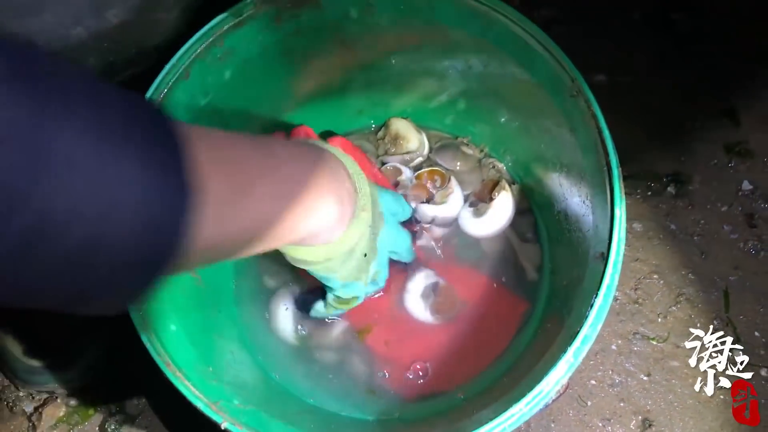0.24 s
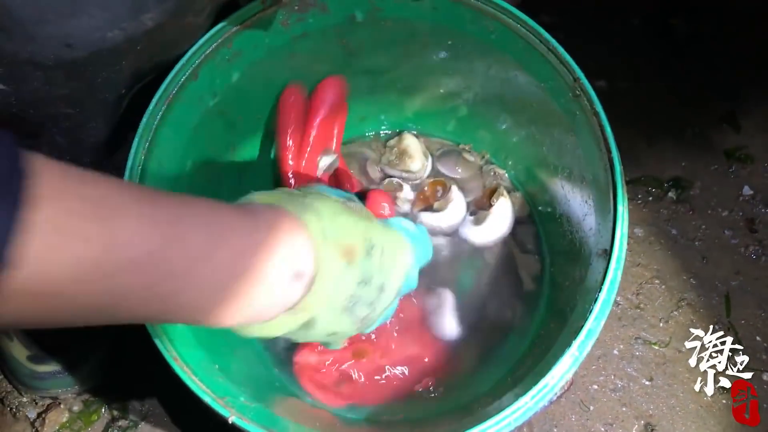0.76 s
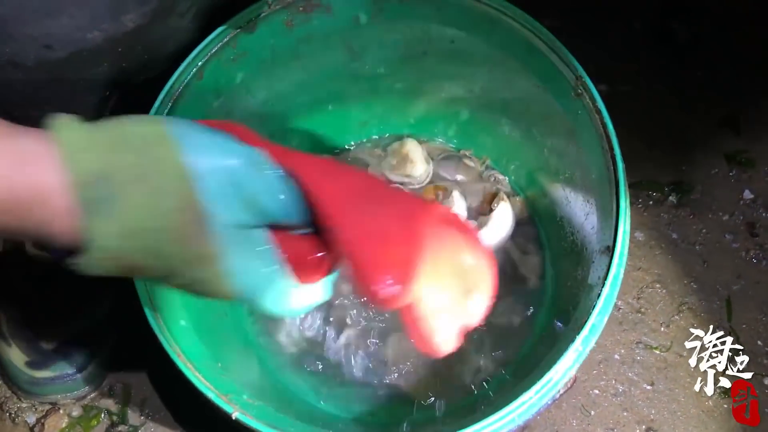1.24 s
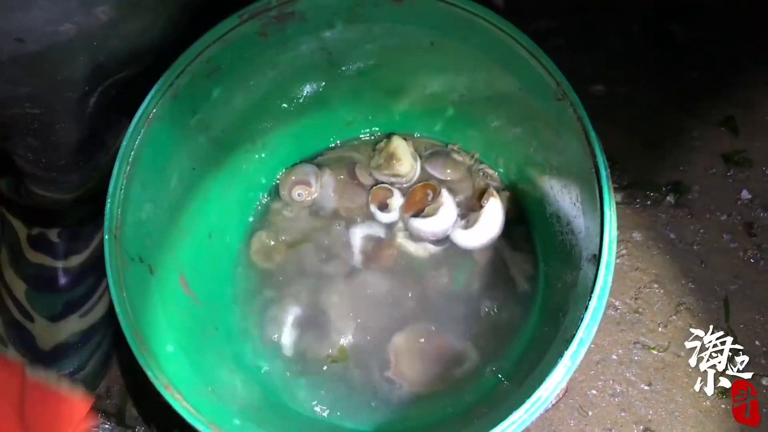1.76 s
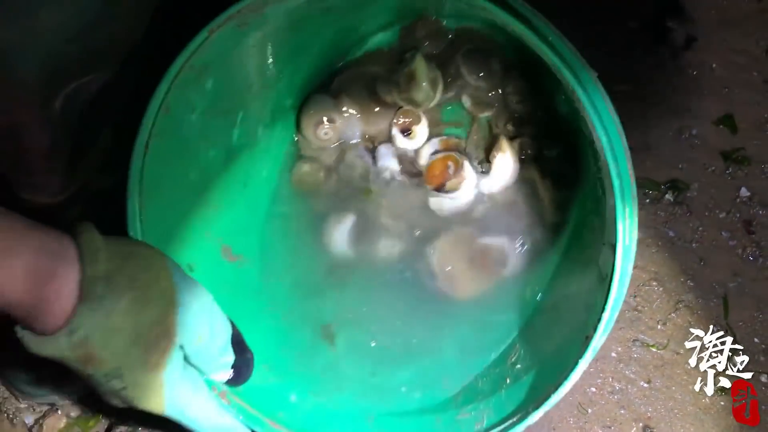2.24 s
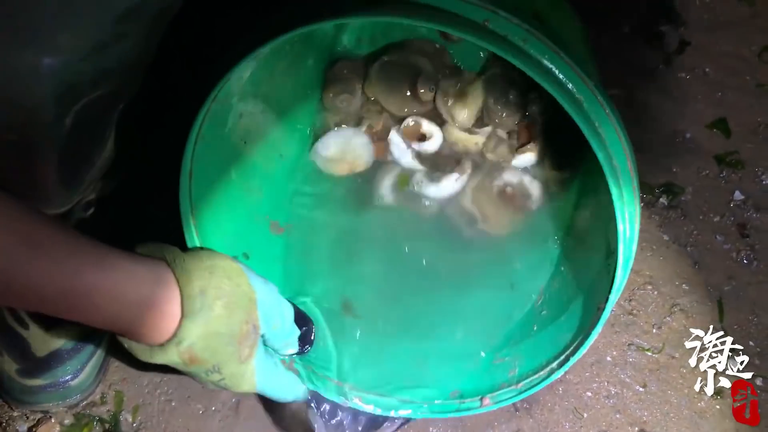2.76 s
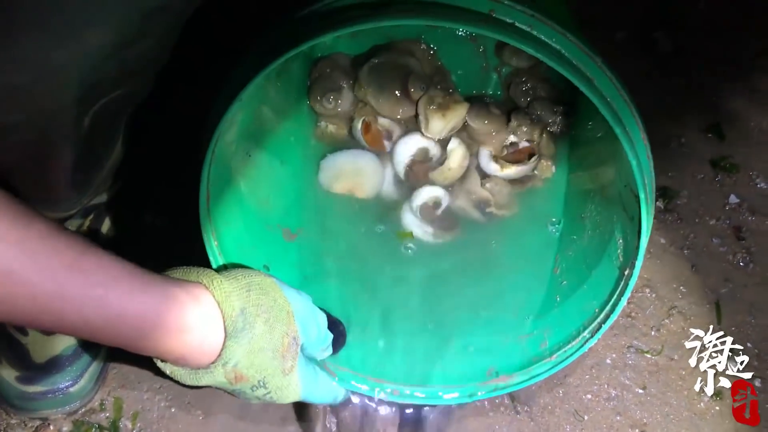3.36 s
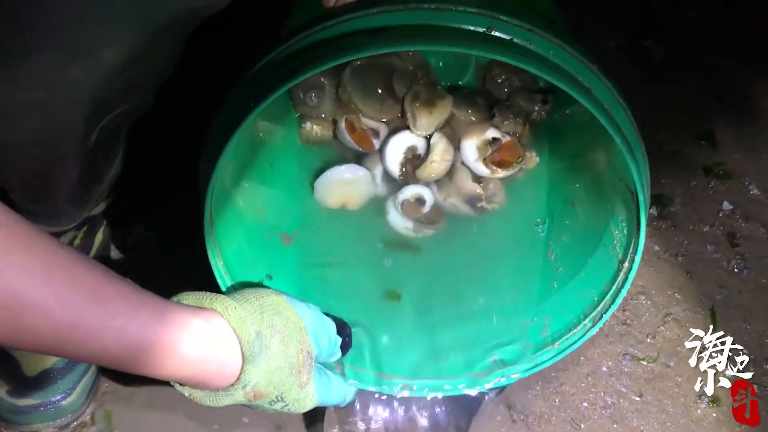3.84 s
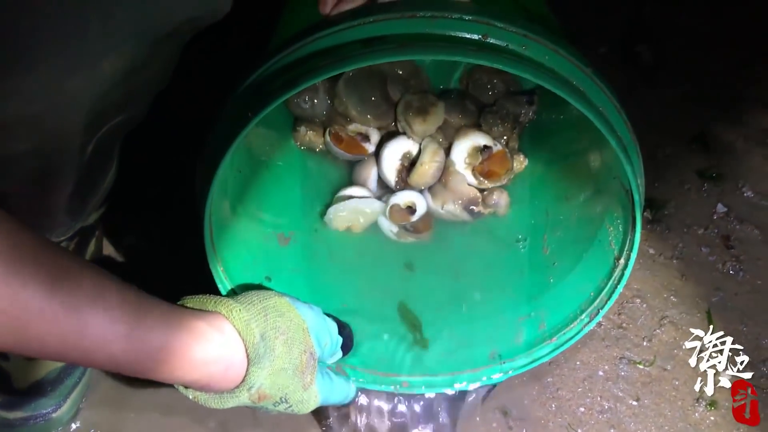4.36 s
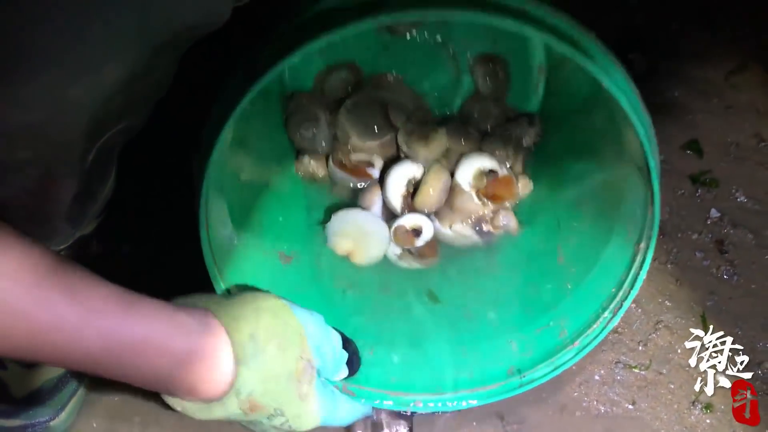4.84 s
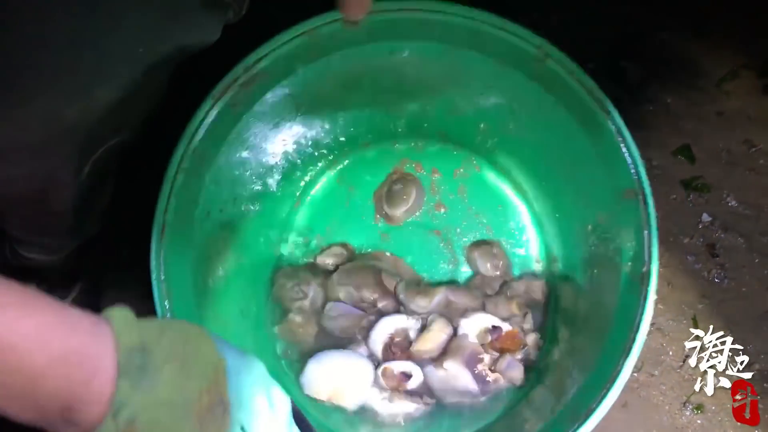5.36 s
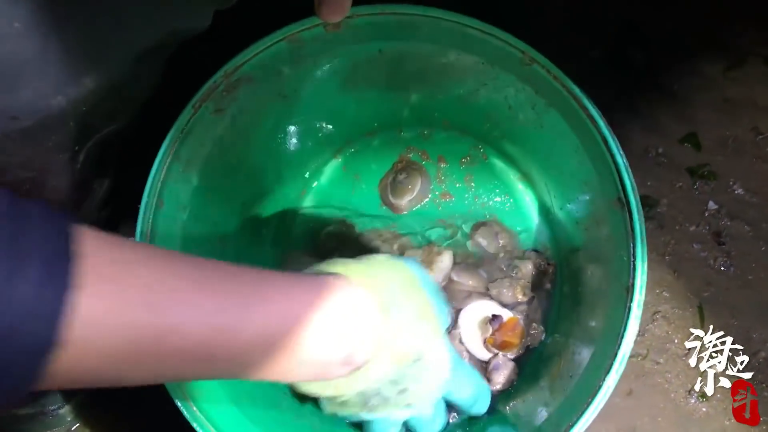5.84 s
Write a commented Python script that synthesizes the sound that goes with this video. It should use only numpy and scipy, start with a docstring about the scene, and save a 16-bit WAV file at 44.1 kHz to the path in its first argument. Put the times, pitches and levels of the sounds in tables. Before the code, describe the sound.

Close outdoor pickup with a faint steady noise bed and brief low wobbles of air against the microphone throughout. From 0 to 0.6 s water slaps and churns in a plastic bucket, with a sharp splash near 0.4. From 0.6 to 0.96 a wet rubber glove drags out, a rough rub and bright hiss growing quickly, then stopping. A splash follows at 1.05, and run-off bubbles and thins until about 1.6, with a few shell ticks. It is nearly quiet until crisp snaps near 2.0. From 2.1 to 2.85 the bucket tips: sloshing surges, shells sliding, hard clicks at 2.5 and 2.7. From 2.95 to 5.2 water pours unevenly onto wet sand, gurgling and spattering with plips and snaps, briefly stronger around 3.1-3.4. The bucket settles with a splash at 5.44. At 5.9 fingers dig in, wet churn and rattling shells peaking around 6.05.

```python
"""Seawater churns among shells in a plastic bucket: crowds of bubbles under a spray of droplets.
A hand pulls a rubber glove out (a rush of noise), tips the bucket, pours the water onto wet sand
(bubbles and spatter), sets it down and stirs the shells, which click as short damped modes.
Slaps, plips, snaps and trickles stand out in between. Outdoors, close by: puffs of air buffet
the microphone as low wobbles over a faint noise backdrop."""
import sys
import numpy as np
from scipy import signal
from scipy.fft import rfft, irfft
from scipy.io import wavfile
from scipy.ndimage import uniform_filter1d

SR = 44100
rng = np.random.default_rng(int(sys.argv[2]) if len(sys.argv) > 2 else 0)


def log_audio(samples):
    """Write samples as a 16-bit WAV file to the path given in sys.argv[1]."""
    # one column per channel
    frames = np.atleast_2d(samples).T
    # limit to full scale, then quantise
    limited = np.clip(frames, -1, 1)
    pcm = np.round(limited * 32767).astype(np.int16)
    wavfile.write(sys.argv[1], SR, pcm)


N = 268833
TIME = np.arange(N) / SR
FREQS = np.fft.rfftfreq(N, 1 / SR)
EDGE_HZ = 16050  # top of the audible band here

# Surges of water in the bucket. Each row: crest in seconds, churn in dB and spray in dB (both before
# the trims in slosh), rise in seconds, fall in seconds.
SURGES = [(.015, -50.5, -42, 0.04, 0.033), (.378, -40.5, -41, 0.038, 0.077), (.485, -49, -47, 0.017, 0.14),
          (.66, -48.5, -60, 0.07, 0.13), (1.055, -44.5, -43, 0.043, 0.082), (2.19, -41.5, -49, 0.26, 0.3),
          (2.35, -42.5, -47.5, 0.023, 0.29), (2.51, -38.5, -51, 0.041, 0.11), (2.69, -40, -47, .06, 0.068),
          (2.82, -43.5, -50, 0.024, 0.079), (5.33, -51, -55, 0.17, .05),
          (5.444, -40.5, -39.5, 0.014, 0.026), (5.56, -48.5, -59, 0.1, 0.41),
          (5.89, -38.5, -42, 0.0049, 0.05), (5.99, -35.5, -49, 0.044, 0.097)]
LAP_DB, LAP_SPRAY_DB = -61, -59.5  # the water never quite comes to rest; before the same trims
# Air in the bucket and its wall. Each row: resonance in Hz, width in Hz, relative level in dB.
BUCKET = [(700, 107, 10.5), (900, 186, 4), (1350, 85, -1.5), (1700, 176, -1), (3260, 210, -21)]
# Tone of the churn and of the spray. Each row: frequency in Hz, relative level in dB.
CHURN_COLOUR = [(150, -14), (300, 3.5), (470, -12), (750, -6), (1300, 0.5), (2000, -1.5), (3000, -7),
                (4500, -17), (8000, -38)]
SPRAY_COLOUR = [(1000, -39), (2500, -2.5), (3600, 1), (4800, -4.5), (6500, -2.5), (8500, -7), (10400, -12),
                (12000, -6), (16000, -8)]

# Wet rubber slides out over the shells, faster and faster until it comes free.
PULL_START_S, PULL_FREE_S, PULL_RELEASE_S = 0.6, 0.96, 0.022
# level at full speed, and the power of the speed that it follows
RUB_DB, RUB_GROWTH, HISS_DB, HISS_GROWTH = -39.5, .6, -34.5, 1.46
# Tone of the rubbing. Each row: frequency in Hz, relative level in dB.
RUB_COLOUR = [(200, -0.5), (600, -8.5), (900, -3), (1100, -5.5), (1400, 9.5), (1650, -10), (2000, 2.5),
              (2700, -14), (3500, -19), (5000, -15), (9000, -41)]

# The stream from the rim onto the sand, strongest when the bucket tips further. Each row: time in
# seconds, bubbling in dB, spatter in dB (both before the trims in pour).
POUR = [(2.95, -58, -79), (2.99, -54, -51), (3.11, -45, -49.5), (3.21, -54, -48), (3.23, -45, -46),
        (3.27, -53.5, -48.5), (3.39, -43, -44.5), (3.74, -55, -51), (3.86, -48.5, -46), (3.87, -46, -52),
        (3.9, -49, -54), (4.33, -43, -50.5), (4.46, -52.5, -55.5), (5.04, -51, -51), (5.12, -48.5, -44),
        (5.2, -72, -63)]
# Water runs off the lifted glove and thins out. Each row: crest in seconds, bubbling in dB and
# spatter in dB (both before the trims in pour), rise in seconds, fall in seconds.
DRAIN = [(1.16, -51.5, -51.5, 0.11, 0.43)]
# Tone of the bubbles and of the spatter. Each row: frequency in Hz, relative level in dB.
BUBBLE_COLOUR = [(300, 11.5), (470, -7), (750, -5.5), (1200, 2.5), (2400, 4), (3600, -1.5), (5000, -20),
                 (8000, -50)]
SPATTER_COLOUR = [(1500, -6), (4000, -2), (6200, 1.5), (8500, -1), (10400, -4), (12200, -0.5), (16000, 0.5)]

# Slaps of water, and two dull low thumps of air (near 400 Hz at 2.07 s and 3.23 s). Each row: start in #
# seconds, burst level in dB before its decay and the bucket, centre in Hz, decay by 60 dB in seconds.
SLAPS = [(.004, -33.5, 1810, 0.081), (0.376, -23, 1500, 0.032), (.415, -32, 1440, 0.065),
         (.476, -31, 1600, 0.067), (0.556, -35, 1520, 0.085), (0.775, -31, 2630, .064),
         (.882, -25, 2000, 0.05), (.923, -29.5, 1670, 0.15), (1.043, -28.5, 930, 0.035),
         (1.111, -28.5, 1330, 0.073), (2.07, -33.5, 400, 0.097), (2.169, -33, 1120, 0.18),
         (2.208, -26.5, 1260, .035), (2.593, -29.5, 1700, 0.066), (2.692, -29.5, 1760, .08),
         (3.055, -32, 1220, .086), (3.231, -23.5, 1060, 0.025), (3.232, -35.5, 370, 0.061),
         (3.353, -29, 1230, 0.051), (4.315, -39, 1360, 0.11), (4.351, -29, 1490, 0.051),
         (4.545, -28.5, 1400, 0.024), (5.07, -24, 1700, 0.024), (5.162, -28, 1300, 0.025),
         (5.44, -25.5, 1120, 0.11), (5.488, -30, 980, 0.07), (5.797, -33.5, 900, 0.028),
         (5.889, -32.5, 1530, 0.062)]
SLAP_RISE_S = .003

# Shells knocking together. Each row: start in seconds, peak in dB before the bucket and scatter,
# lowest mode in Hz, decay of that mode by 60 dB in seconds.
KNOCKS = [(1.184, -24, 6000, 0.025), (1.225, -29.5, 3280, .028), (1.445, -35, 6270, 0.036),
          (2.259, -26.5, 1060, 0.0071), (2.482, -18, 3850, 0.02), (2.483, -24, 1640, 0.029),
          (2.689, -14, 1620, 0.0033), (2.891, -28, 1080, 0.013), (3.054, -26.5, 1230, 0.016),
          (3.107, -26.5, 2530, 0.027), (3.130, -24, 3230, 0.02), (3.849, -27.5, 5230, 0.026),
          (5.889, -26.5, 1000, 0.015), (6.058, -19, 825, .023), (6.059, -23, 2430, .02),
          (6.078, -43, 2830, 0.016), (6.081, -20.5, 1254, 0.044)]
# Modes of a shell. Each row: ratio to the lowest mode, signed amplitude before the wet damping.
SHELL_MODES = [(1, 0.8), (1.13, -0.77), (1.36, 0.81), (1.83, -0.22), (2.7, 0.23)]
CRACK_DB = -2.5  # the dry crack of a knock against its ring
WET_CUTOFF_HZ = 7500  # a film of water muffles the modes above this
# Shells slide in the tipped bucket, later the fingers dig through them. Each row: crest in seconds,
# rattle in dB, rise in seconds, fall in seconds.
RUMMAGE = [(2.19, -46, 0.093, .04), (2.34, -42.5, 0.038, 0.094), (2.53, -43, 0.027, 0.021),
           (2.7, -50, 0.038, 0.047), (5.89, -44, 0.0063, .025), (6.05, -34.5, .04, 0.17)]
# Shells in the heap. Each row: resonance in Hz, width in Hz, relative level in dB.
HEAP = [(900, 22, 12.5), (1220, 120, 1.0), (1803, 31, 10.5), (2040, 110, -5),
        (2850, 200, -5), (3400, 370, 0.0), (4100, 180, -10), (5300, 280, -22)]

# Single large bubbles. Each row: start in seconds, level in dB before onset and decay, first pitch in Hz.
PLIPS = [(1.042, -30, 3400), (1.677, -39, 7230), (2.523, -28.5, 2940), (2.700, -26, 1850),
         (3.045, -32, 7600), (3.316, -30, 873), (3.492, -27.5, 2500), (3.609, -30, 2320),
         (3.866, -27, 1180), (3.876, -27.5, 1610), (4.313, -24, 2950), (4.352, -27.5, 2500),
         (4.641, -33.5, 1087), (4.728, -35.5, 1120), (4.911, -36, 3970), (5.463, -32, 1880)]
# decay by 60 dB at that pitch; higher, smaller bubbles die sooner by this power
PLIP_T60_S, PLIP_HZ, PLIP_DAMPING = 0.025, 2000, 0.31
# Dry snaps of drops and of the plastic rim. Each row: start in seconds, peak in dB before the bucket
# and scatter, centre in Hz, decay of the burst by 60 dB in seconds.
SNAPS = [(.485, -36.5, 7000, 0.014), (.493, -33, 7000, 0.0092), (.534, -33.5, 10000, 0.0068),
         (0.558, -37.5, 4960, 0.0062), (0.772, -31, 3860, 0.022), (1.066, -31, 12200, 0.046),
         (1.736, -34, 14300, 0.0088), (1.974, -25.5, 11300, 0.027), (1.978, -25, 3600, 0.029),
         (2.001, -33.5, 2980, 0.027), (2.01, -21, 7750, 0.0049), (2.513, -30, 7750, 0.0098),
         (2.689, -29.5, 4470, 0.032), (3.106, -33.5, 11000, .028), (3.807, -35, 7060, 0.014),
         (4.043, -36.5, 11100, 0.028), (4.238, -31, 4020, 0.005), (4.257, -30, 9000, 0.027),
         (4.321, -26.5, 9000, 0.0076), (4.421, -36, 7800, 0.026), (4.482, -37.5, 13000, .011),
         (4.545, -36.5, 9000, 0.01), (4.957, -40, 7100, 0.035), (5.130, -32, 10500, 0.025)]
# Thin films of water running off the glove, later back down the wall. Each row: crest in seconds,
# level in dB, centre in Hz, rise in seconds, fall in seconds.
TRICKLES = [(1.36, -56.5, 3540, .12, 0.18), (5.32, -54, 2500, 0.069, 0.14)]

# Low puffs of air against the microphone. Each row: peak in seconds, peak level in dB, pitch at the
# peak in Hz, time from the peak until it is about 11 dB down in seconds.
BUFFETS = [(0.436, -23.5, 140.6, 0.0077), (.521, -37.5, 57.7, 0.049), (1.024, -26, 108.7, 0.017),
           (1.159, -28.5, 103.4, 0.0057), (1.226, -28, 74, 0.0068), (1.354, -26.5, 119.8, 0.012),
           (1.55, -25.5, 119.7, 0.01), (1.587, -27.5, 97.2, 0.027), (2.078, -19.5, 100, 0.019),
           (2.153, -28, 85, 0.019), (2.209, -23.5, 85.3, 0.011), (2.345, -32.5, 76.3, 0.015),
           (2.616, -31, 86.8, 0.0088), (3.201, -33.5, 91.2, 0.017), (3.765, -25.5, 68.8, 0.009),
           (3.937, -34, 62.2, 0.01), (4.05, -26.5, 91.8, 0.0059), (4.335, -33, 73.2, 0.042),
           (4.437, -29, 99.3, 0.011), (4.479, -23, 90.8, 0.006), (4.63, -32.5, 132, 0.017),
           (4.784, -25.5, 91.2, 0.013), (4.885, -27, 70.7, 0.014), (4.978, -24.5, 71.1, 0.0056),
           (5.011, -27.5, 58.6, 0.0093), (5.079, -24.5, 75.6, 0.0067), (5.176, -28, 107.6, 0.0034),
           (5.491, -25, 104.1, 0.011), (5.618, -26, 132.4, 0.017), (5.683, -30.5, 78, 0.029),
           (5.844, -31.5, 70, 0.011), (5.934, -21.5, 105.5, 0.013), (5.978, -24, 140, 0.015),
           (6.015, -29, 69.2, 0.011)]
EDDY_DB, EDDY_HZ, EDDY_DB_PER_OCTAVE = -11, 100, 19  # quicker puffs shed more fine eddies
RUMBLE_DB, RUMBLE_WANDER_DB = -49, -1.5  # restless air under the puffs
# Tone of the eddies, the rumble and the backdrop. Each row: frequency in Hz, relative level in dB.
EDDY_COLOUR = [(60, -22), (130, 6.5), (190, 4), (300, -6), (450, -16.5), (700, -30.5),
               (1500, -29), (4000, -72)]
AIR_COLOUR = [(15, -16), (25, -51), (45, 9), (75, 7), (160, -4), (300, -20.5), (500, -56), (1500, -66)]
BACKDROP_COLOUR = [(100, 20), (300, 1), (470, 0.5), (900, 4.5), (1600, -2.5), (3000, -12.5), (5000, -20),
                   (10000, -16.5), (16000, -15)]

# levels in dB of two faint high-frequency noise layers that differ between left and right
SIDE_HAZE_DB, SIDE_RUSH_DB = -27, -9.5


def slosh():
    """Water churns between the shells in a crowd of damped bubbles, with a spray of droplets on top."""
    churn = froth(per_s=3000, low_hz=249.4, high_hz=5490, cycles=15, rise=0.04, spread_db=4.5)
    churn = bucket(scatter(churn, t60=0.035, wet_db=-8.5), ring_db=-3.5)
    churn = colour(churn, CHURN_COLOUR)
    beads = froth(per_s=910, low_hz=2500, high_hz=14100, cycles=86, rise=0.028, spread_db=0.0)
    drops = patter(per_s=800, spread_db=-3.5, t60=0.015)
    drops = mottle(drops, patchy_db=4.5, width_hz=680, length_s=0.012)
    spray = colour(drops + amp(-6.5) * beads, SPRAY_COLOUR)
    churning = np.hypot(swells(SURGES, axis=1), amp(LAP_DB))
    spraying = np.hypot(swells(SURGES, axis=2), amp(LAP_SPRAY_DB))
    return amp(1.0) * steady(churn) * churning + amp(-3.5) * steady(spray) * spraying


def glove():
    """Wet rubber drags over shells and sheds water: a dense rush that stops as it comes free."""
    rub = colour(patter(per_s=860, spread_db=3.5, t60=0.042), RUB_COLOUR)
    hiss = patter(per_s=5800, spread_db=2, t60=0.016)
    hiss = colour(mottle(hiss, patchy_db=2.5, width_hz=590, length_s=0.0033), SPRAY_COLOUR)
    speed = np.clip((TIME - PULL_START_S) / (PULL_FREE_S - PULL_START_S), 0, 1)
    contact = np.exp(-np.clip((TIME - PULL_FREE_S) / PULL_RELEASE_S, 0, 20))
    grip = wander(depth_db=1.5, rate_hz=56)
    rubbing = amp(RUB_DB) * grip * steady(rub) * speed ** RUB_GROWTH
    hissing = amp(HISS_DB) * steady(hiss) * speed ** HISS_GROWTH
    return contact * (rubbing + hissing)


def pour():
    """Poured water and the glove's run-off break into drops that smack down and trap rising bubbles."""
    bubbles = froth(per_s=900, low_hz=550, high_hz=6000, cycles=34, rise=.22, spread_db=4.3)
    smacks = patter(per_s=900, spread_db=4.8, t60=.013)
    smacks = mottle(smacks, patchy_db=2.5, width_hz=700, length_s=.004)
    fizz = froth(per_s=1000, low_hz=3000, high_hz=15000, cycles=38, rise=.15, spread_db=4.8)
    body = colour(scatter(bubbles + amp(-6) * smacks, t60=.07, wet_db=-5), BUBBLE_COLOUR)
    spatter = colour(scatter(smacks + amp(-1) * fizz, t60=.06, wet_db=-6), SPATTER_COLOUR)
    bubbling = level(POUR, axis=1) + swells(DRAIN, axis=1)
    spattering = level(POUR, axis=2) + swells(DRAIN, axis=2)
    stream = amp(1) * steady(body) * bubbling + amp(-0.5) * steady(spatter) * spattering
    return stream * wander(depth_db=2.5, rate_hz=29)


def slaps(breadth=0.31, size=9000):
    """A sheet of water hits and breaks up, or a low puff of air thumps: a sudden band of noise that dies fast."""
    out, t = np.zeros(N), np.arange(size) / SR
    for s, db, hz, t60 in SLAPS:
        burst = unit(resonate(rng.standard_normal(size), hz, breadth * hz))
        add(out, s, amp(db) * burst * (1 - np.exp(-t / SLAP_RISE_S)) * 1000 ** (-t / t60))
    return bucket(out, ring_db=-25.0)


def knocks(crack_t60=0.017, crack_breadth=0.28, size=4000):
    """A dry crack and a few uneven shell modes; the higher ones are muffled by water and die soonest."""
    out, t = np.zeros(N), np.arange(size) / SR
    for s, db, hz, t60 in KNOCKS:
        ring = np.zeros(size)
        for ratio, gain in SHELL_MODES:
            mode_hz = hz * ratio
            if mode_hz < EDGE_HZ:
                wet_gain = gain / (1 + (mode_hz / WET_CUTOFF_HZ) ** 4)
                ring += wet_gain * np.sin(2 * np.pi * mode_hz * t) * 1000 ** (-t / t60 * ratio)
        crack = rng.standard_normal(size) * 1000 ** (-t / crack_t60)
        crack = resonate(crack, hz, crack_breadth * hz)
        add(out, s, amp(db) * crest(crest(ring) + amp(CRACK_DB) * crest(crack)))
    return scatter(bucket(out, ring_db=-8), t60=.06, wet_db=-15)


def rummage():
    """Many small collisions, each stream of them ringing one of the shells in the heap."""
    rattle = np.zeros(N)
    for hz, width_hz, db in HEAP:
        hits = patter(per_s=460, spread_db=1, t60=0.0039)
        rattle += amp(db) * unit(resonate(hits, hz, width_hz))
    return steady(rattle) * swells(RUMMAGE, axis=1)


def plips():
    """Large bubbles that stand out from the froth."""
    out = np.zeros(N)
    for s, db, hz in PLIPS:
        t60 = PLIP_T60_S * (PLIP_HZ / hz) ** PLIP_DAMPING
        add(out, s, amp(db) * bubble(hz, t60, rise=0.19))
    return out


def snaps(breadth=4.4, size=3000):
    """Very short, wide cracks with no modes of their own, coloured by the bucket."""
    out, t = np.zeros(N), np.arange(size) / SR
    for s, db, hz, t60 in SNAPS:
        burst = rng.standard_normal(size) * 1000 ** (-t / t60)
        add(out, s, amp(db) * crest(resonate(burst, hz, breadth * hz)))
    return scatter(bucket(out, ring_db=7.5), t60=0.011, wet_db=5.0)


def trickle(breadth=.2):
    """Dense tiny bursts through one narrow resonance per film merge into a soft wash."""
    fizz, out = patter(per_s=5200, spread_db=5, t60=0.017), np.zeros(N)
    for row in TRICKLES:
        hz = row[2]
        out += unit(resonate(fizz, hz, breadth * hz)) * swells([row], axis=1)
    return out


def air(sag=0.2897, wake_db=-15, wake_length=5.9, size=10000):
    """Each puff rocks the microphone briefly, falling in pitch as it passes, with low rumble around it."""
    (out, stir, wake), t = np.zeros((3, N)), (np.arange(size) - size / 2) / SR
    for s, db, hz, length in BUFFETS:
        fine_db = EDDY_DB + EDDY_DB_PER_OCTAVE * np.log2(hz / EDDY_HZ)
        swell = 1 / np.cosh(np.minimum(1.91 * abs(t) / length, 20))
        start = s - size / 2 / SR
        turns = np.cumsum(hz * (1 - sag * np.tanh(t / length))) / SR + rng.random()
        add(out, start, amp(db) * swell * np.sin(2 * np.pi * turns))
        # powers below one stretch the swell
        add(stir, start, amp(db + fine_db) * swell ** 0.63)
        add(wake, start, amp(db + wake_db) * swell ** (1 / wake_length))
    eddies = colour(rng.standard_normal(N), EDDY_COLOUR)
    restless = amp(RUMBLE_DB) * wander(depth_db=RUMBLE_WANDER_DB, rate_hz=18)
    rumble = steady(colour(rng.standard_normal(N), AIR_COLOUR)) * (restless + wake)
    return out + steady(eddies, size=500) * stir + rumble


def backdrop():
    """A faint, even outdoor bed of coloured noise."""
    return amp(-51) * colour(rng.standard_normal(N), BACKDROP_COLOUR)


def bubble(hz, t60, rise):
    """A bubble rings and goes up in pitch as it nears the surface."""
    t = np.arange(int(t60 * SR) + 8) / SR
    tone = np.sin(2 * np.pi * hz * (t + rise * t * t / t60 / 2))
    return tone * 1000 ** (-t / t60) * (1 - np.exp(-t * hz * 2))


def froth(per_s, low_hz, high_hz, cycles, rise, spread_db, count=48):
    """A swarm of bubbles of many sizes; each lasts about the same number of cycles."""
    births, kind, out = arrivals(per_s, spread_db), rng.integers(0, count, N), np.zeros(N)
    for k, (place, life, lift) in enumerate(rng.random((count, 3))):
        hz = low_hz * (high_hz / low_hz) ** ((k + place) / count)
        ring = bubble(hz, cycles * (.5 + life) / hz, rise * 2 * lift) * np.sqrt(hz / low_hz)
        for at in np.flatnonzero(births * (kind == k)):
            add(out, at / SR, births[at] * ring)
    return unit(out)


def patter(per_s, spread_db, t60):
    """Drops that burst: each is its own tiny puff of noise."""
    strikes = arrivals(per_s, spread_db) ** 2
    power = signal.lfilter([1], [1, -1000 ** (-2 / t60 / SR)], strikes)
    return unit(rng.standard_normal(N) * np.sqrt(power))


def arrivals(per_s, spread_db):
    """Random impulses of either sign; sizes thin out upward from one, or downward for a negative spread."""
    chance, size, sign = rng.random(N), rng.exponential(1, N), rng.choice([-1, 1], N)
    return (chance < per_s / SR) * sign * amp(spread_db * np.minimum(size, 4))


def mottle(x, patchy_db, width_hz, length_s):
    """Moving water favours one patch of the spectrum after another."""
    hz, t, z = signal.stft(x, SR, nperseg=256)
    patch_hz = np.exp(-((hz[:33] - hz[16]) / width_hz) ** 2)
    patch_time = np.exp(-((t[:33] - t[16]) / length_s) ** 2)
    field = signal.fftconvolve(rng.standard_normal(z.shape), np.outer(patch_hz, patch_time), "same")
    return unit(signal.istft(z * amp(patchy_db * unit(field)), SR, nperseg=256)[1][:N])


def bucket(x, ring_db):
    """The open bucket adds its broad resonances to whatever sounds inside."""
    return x + amp(ring_db) * sum(amp(db) * resonate(x, hz, width) for hz, width, db in BUCKET)


def scatter(x, t60, wet_db, size=4000, count=5):
    """Quick, dense reflections; the paths keep changing as the water moves."""
    tails = rng.standard_normal((count, size)) * 1000 ** (-np.arange(size) / SR / t60)
    tails /= np.linalg.norm(tails, axis=1)[:, None]
    knots = np.linspace(0, N / SR, 240)
    shares = np.array([np.interp(TIME, knots, rng.standard_normal(240)) for _ in tails])
    shares /= np.sqrt((shares ** 2).sum(0))
    wet = signal.oaconvolve(x * shares, tails, axes=1).sum(0)
    return x + amp(wet_db) * wet[:N]


def resonate(x, hz, width_hz):
    """One resonance of gain one."""
    b, a = signal.iirpeak(min(hz, SR / 2 - 2000), hz / min(width_hz, SR / 4), SR)
    return signal.lfilter(b, a, x)


def colour(x, points):
    """Gives x a spectrum drawn on a log-frequency axis, at an rms of one."""
    hz, db = np.transpose(points)
    gain = amp(np.interp(np.log(FREQS + 1), np.log(hz), db))
    return unit(irfft(rfft(x) * gain, N))


def level(curve, axis):
    """Gain over time from one column of a curve, silent outside it."""
    points = np.array(curve)
    db = np.interp(TIME, points[:, 0], points[:, axis], left=-np.inf, right=-np.inf)
    return uniform_filter1d(amp(db), size=300)


def swells(rows, axis):
    """Gain over time: each movement gathers to its crest and dies away; their powers add."""
    power = np.zeros(N)
    for row in rows:
        since, (rise_s, fall_s) = TIME - row[0], row[-2:]
        depth = np.where(since < 0, (since / rise_s) ** 2, since / fall_s)
        power += (amp(row[axis]) * np.exp(-np.minimum(depth, 20))) ** 2
    return np.sqrt(power)


def wander(depth_db, rate_hz):
    """A gain that drifts at random around one."""
    slow = np.exp(-np.minimum((FREQS / rate_hz) ** 2, 20))
    drift = irfft(rfft(rng.standard_normal(N)) * slow, N)
    return unit(amp(depth_db * unit(drift)))


def steady(x, size=2600):
    """Evens out the slow level of a stream of grains and leaves the single grains standing."""
    power = uniform_filter1d(uniform_filter1d(x ** 2, size), size)
    return x / np.sqrt(abs(power) + 1e-9)


def amp(db):
    """Decibels to gain."""
    return 10 ** (np.asarray(db) / 20)


def unit(x):
    """Scales to an rms of one."""
    return x / np.sqrt(np.mean(x ** 2) + 1e-20)


def crest(x):
    """Scales to a peak of one."""
    return x / (abs(x).max() + 1e-20)


def add(mix, s, sound):
    """Lays a sound into the mix at time s in seconds."""
    part = mix[max(round(s * SR), 0):][:len(sound)]
    part += sound[:len(part)]


def scene():
    """Everything is mixed to the middle; a little high-frequency noise is added to the sides."""
    water = slosh() + pour() + slaps() + plips() + trickle()
    solids = glove() + knocks() + rummage() + snaps()
    mid = water + solids + air() + backdrop()
    highpass = signal.butter(8, 5000, "high", fs=SR, output="sos")
    # the second layer is a fresh noise that follows the level of the pull
    treble, rush = signal.sosfilt(highpass, [mid, glove()])
    haze = scatter(treble, t60=0.002, wet_db=SIDE_HAZE_DB) - treble
    side = haze + amp(SIDE_RUSH_DB) * rush
    return np.array([mid + side, mid - side])


def record(dry):
    """A steep lowpass closes the band at its top edge."""
    lowpass = signal.firwin(401, EDGE_HZ, window=("kaiser", 9), fs=SR)
    return signal.oaconvolve(dry, lowpass[None], "same")


dry = scene()
out = record(dry)
log_audio(out)
```